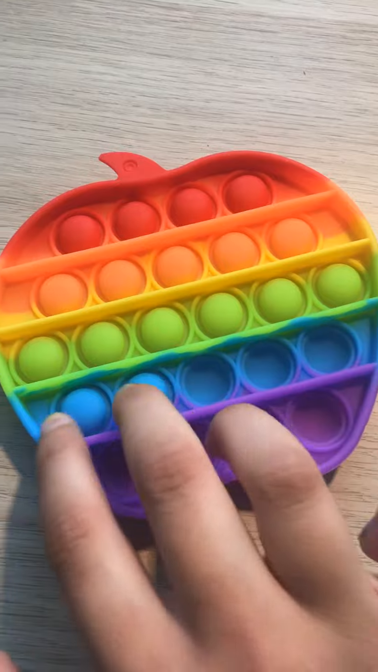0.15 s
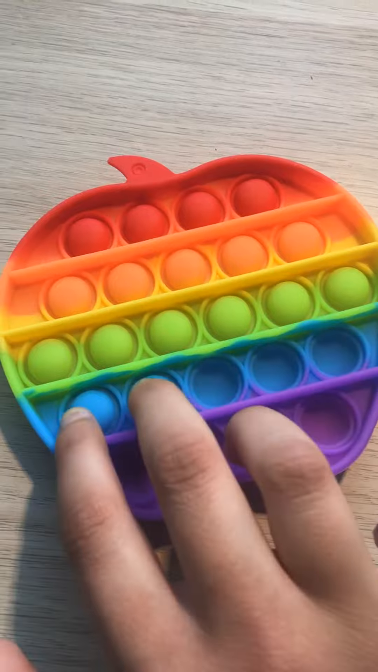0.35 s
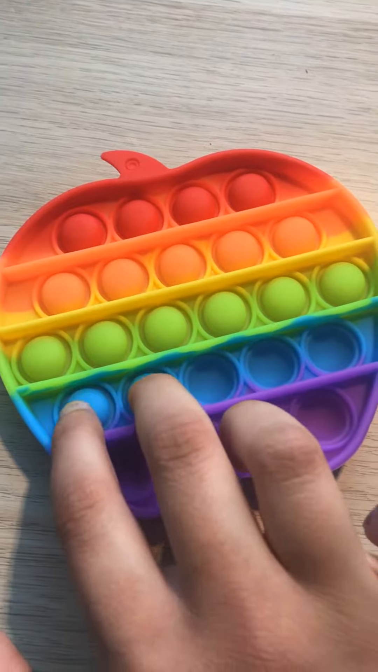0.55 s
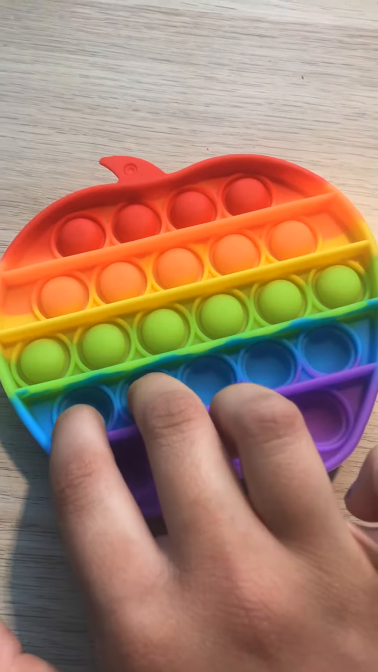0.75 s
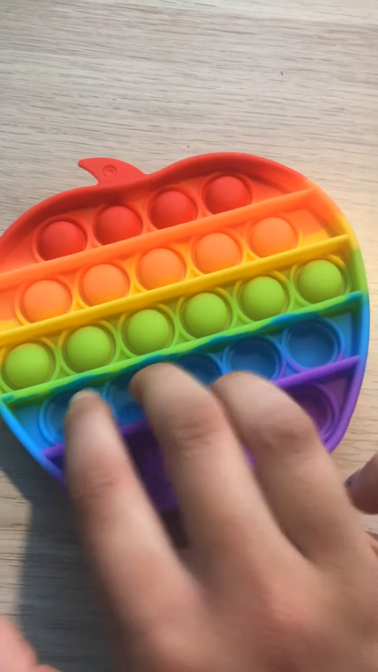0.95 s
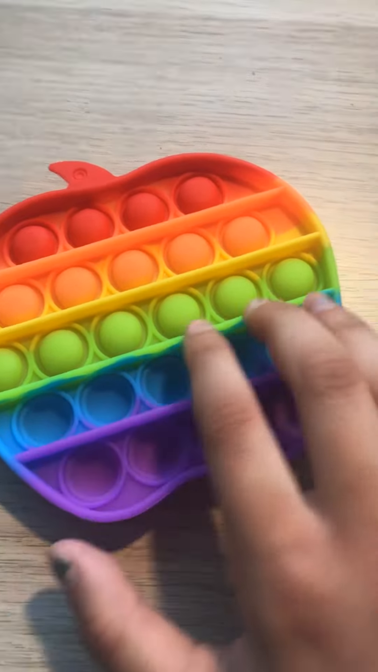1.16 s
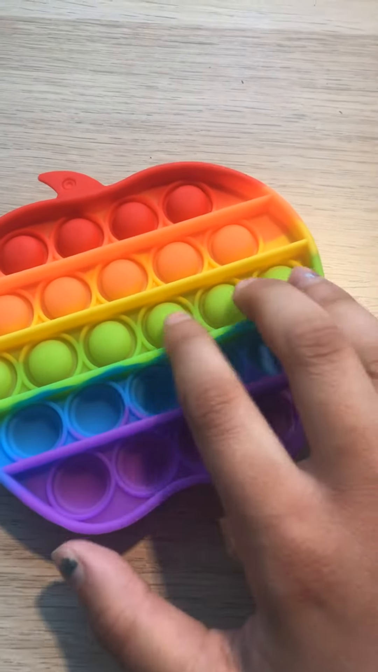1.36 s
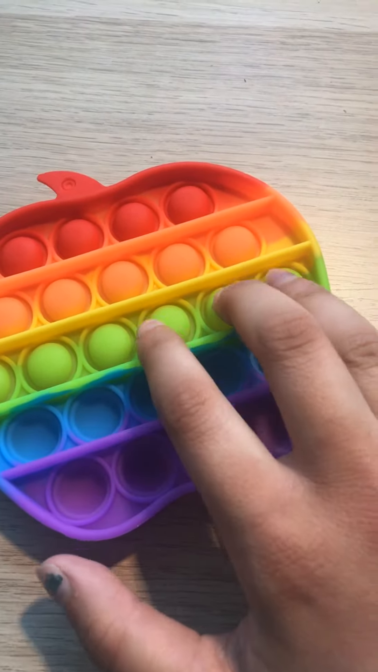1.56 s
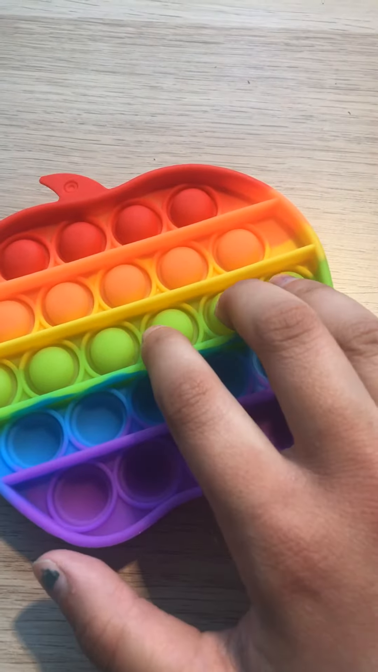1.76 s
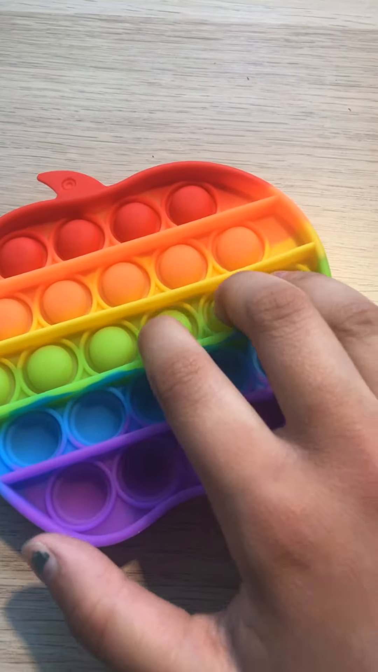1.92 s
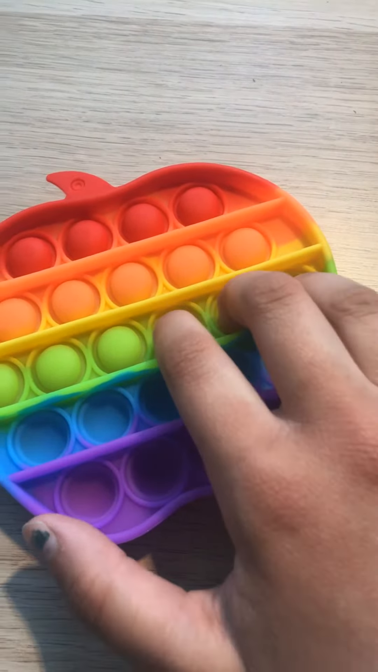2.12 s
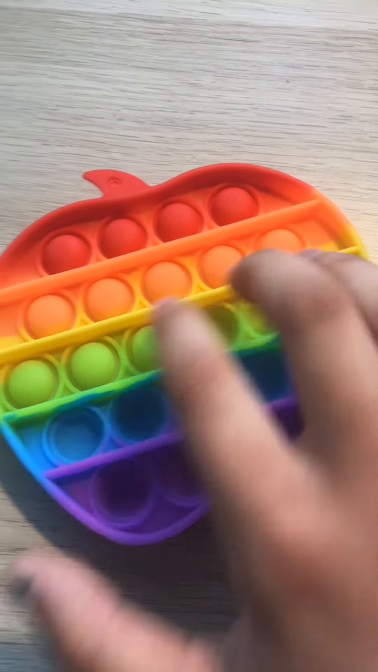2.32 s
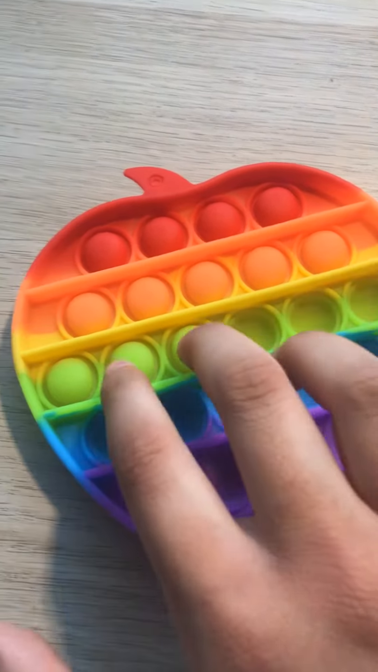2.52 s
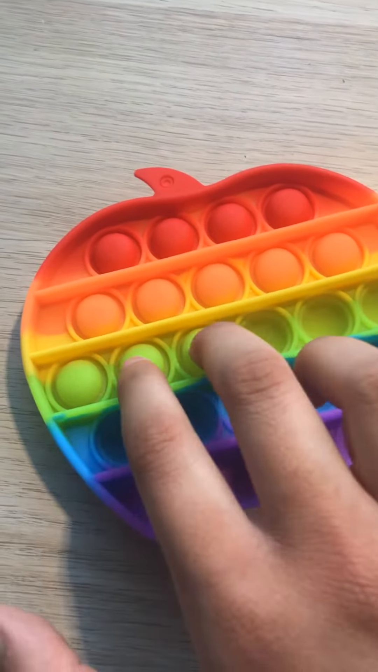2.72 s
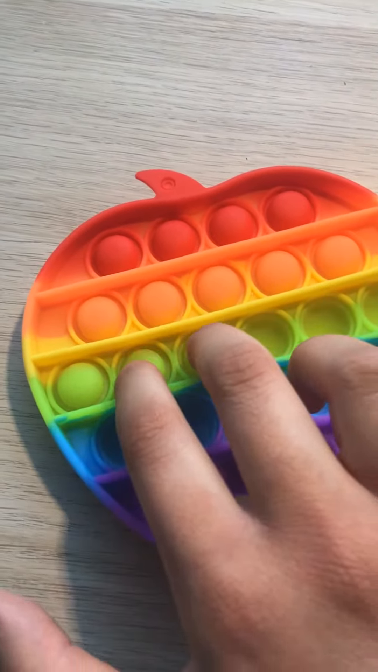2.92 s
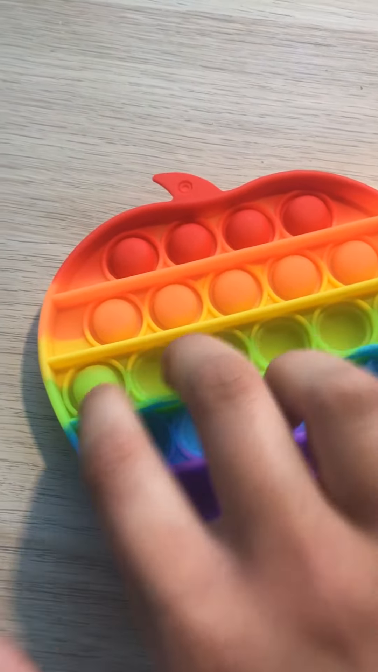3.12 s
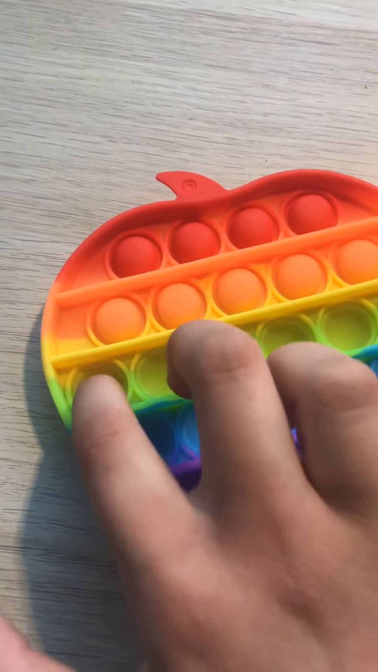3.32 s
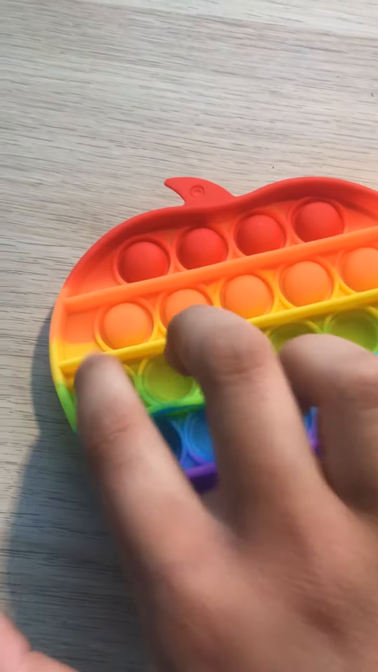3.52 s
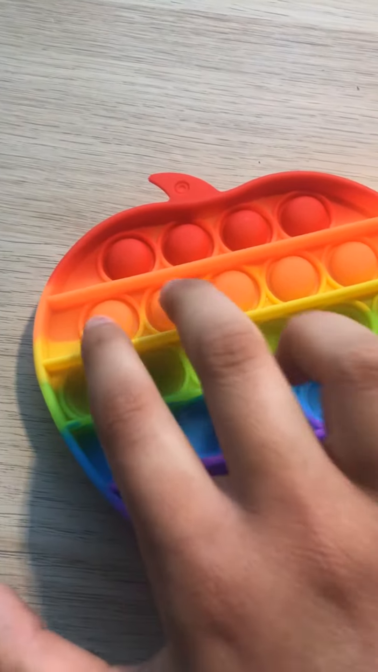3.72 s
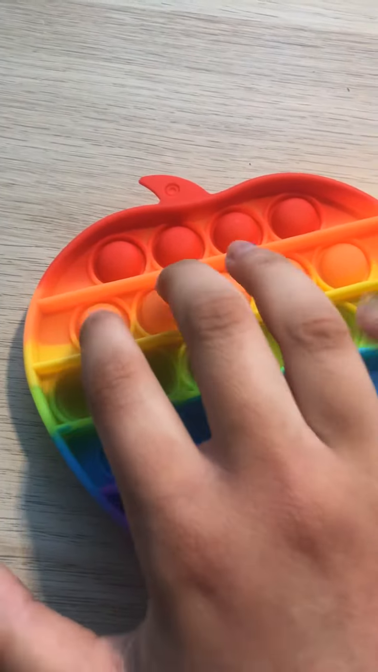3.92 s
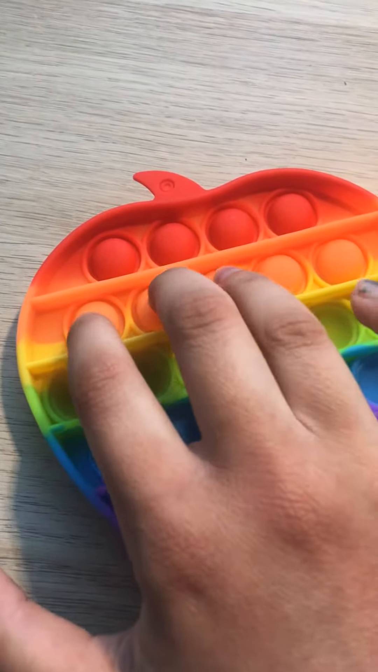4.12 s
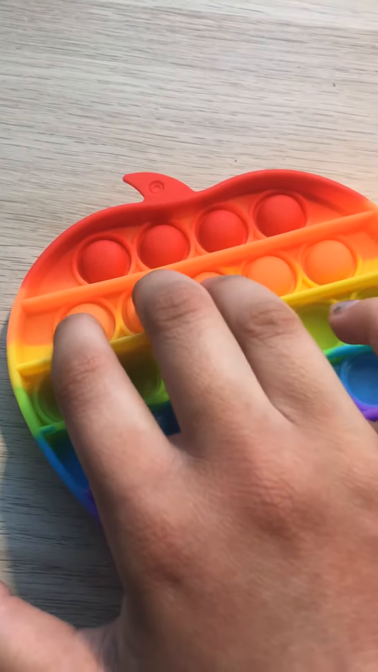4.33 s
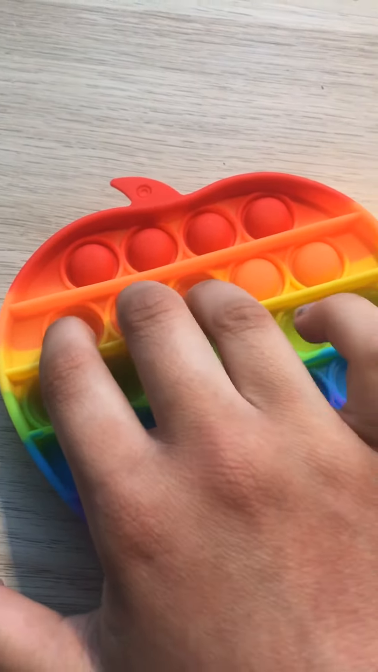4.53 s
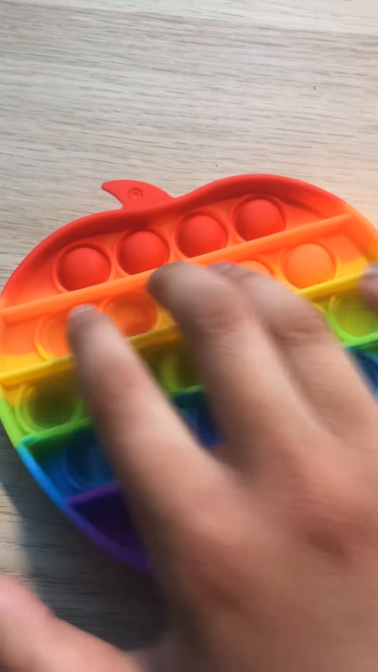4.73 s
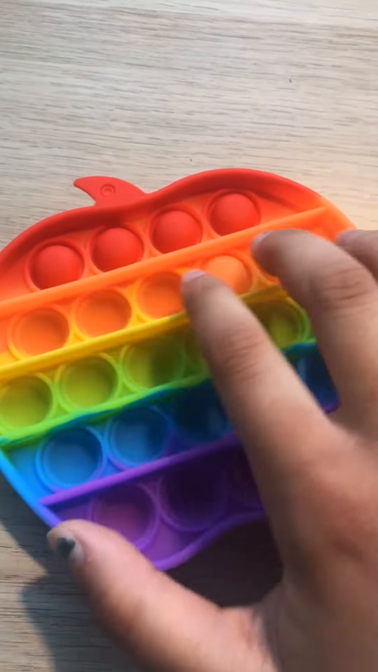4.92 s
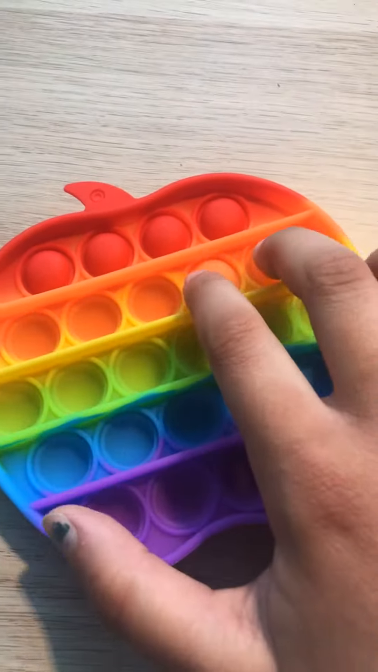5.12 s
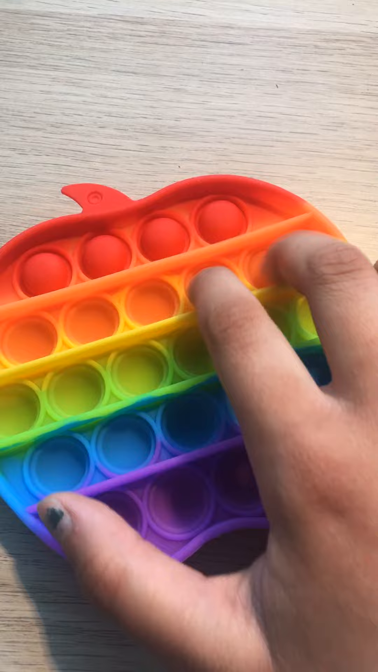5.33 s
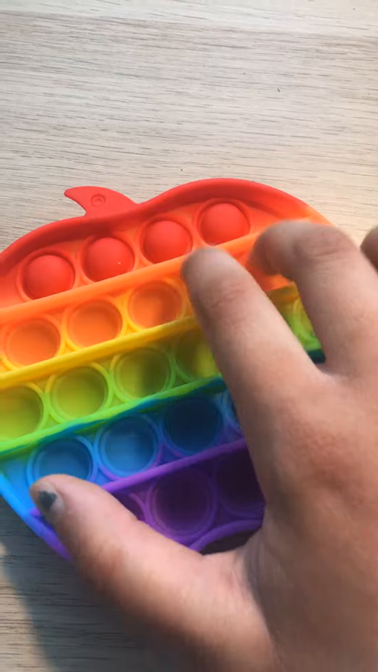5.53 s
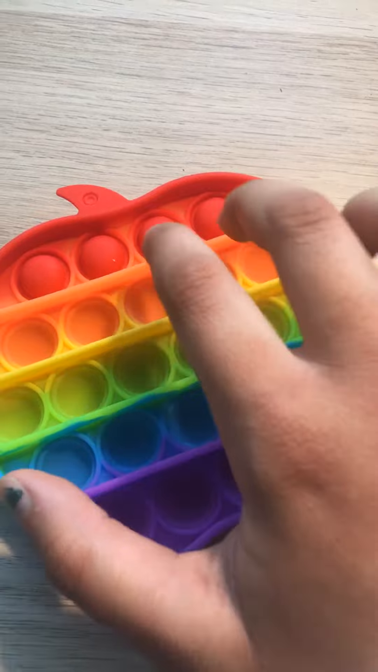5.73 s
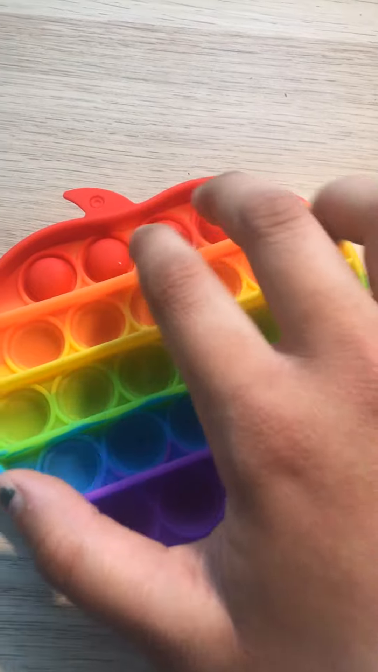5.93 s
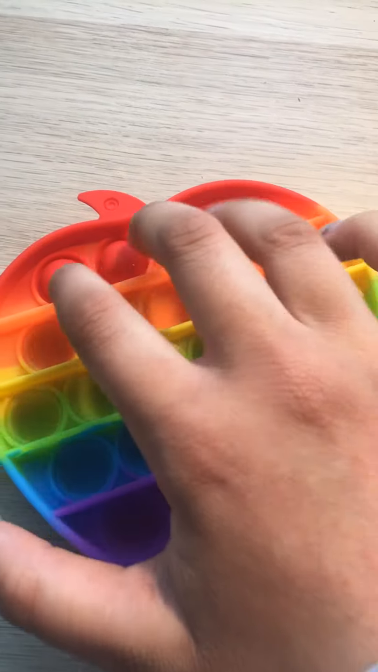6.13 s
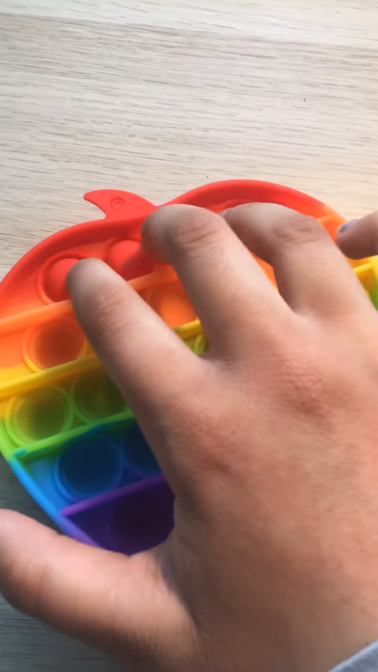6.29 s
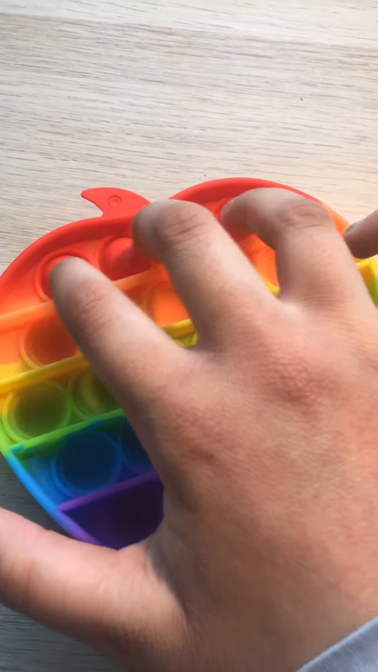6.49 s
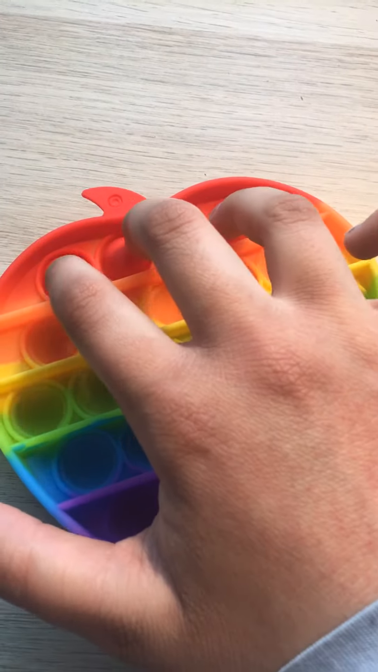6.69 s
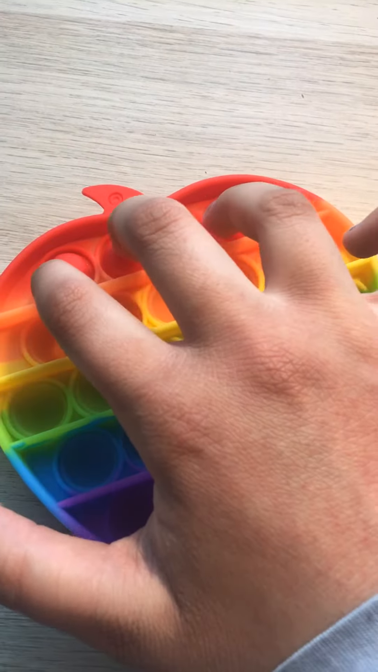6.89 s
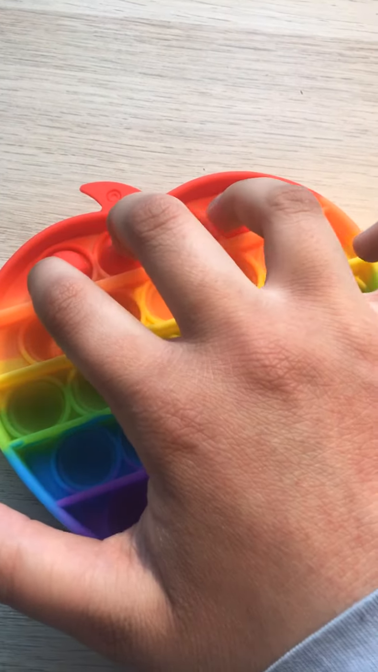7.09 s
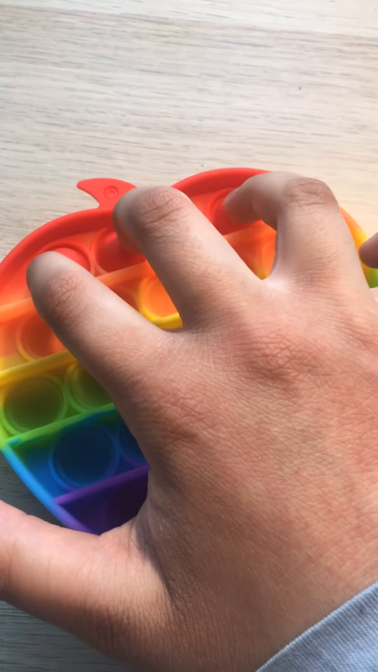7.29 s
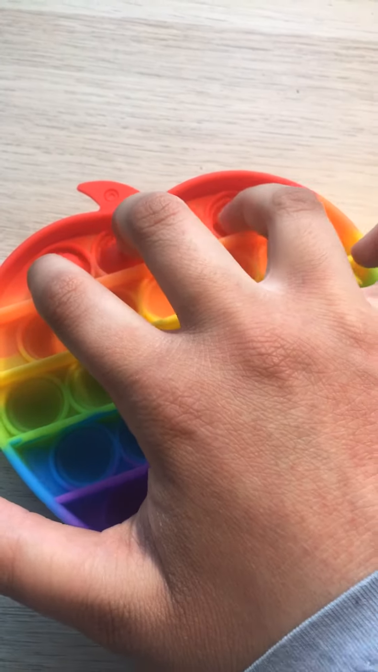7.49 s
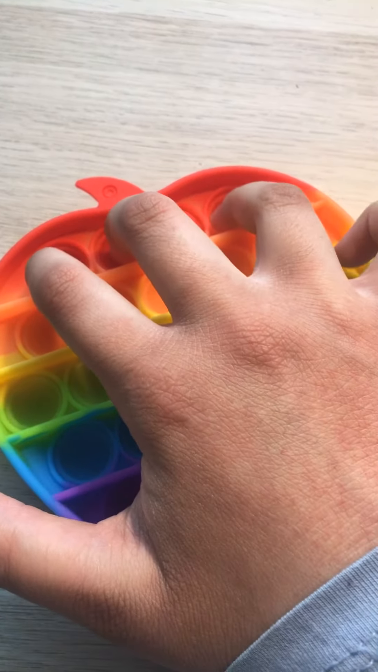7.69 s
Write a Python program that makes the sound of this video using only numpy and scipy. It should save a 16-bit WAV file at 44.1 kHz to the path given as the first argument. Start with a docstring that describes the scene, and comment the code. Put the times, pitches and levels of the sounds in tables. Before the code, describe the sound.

A rubbery bubble toy is popped by fingers on a wooden table, close to the microphone in a small quiet room. Tight pairs and triples of short hollow pops come about a second apart, with a couple of single ones, and near silence with faint soft hiss between. Later pops sound thinner, with less bass, and the last come after a long pause.

```python
"""Soft hiss runs throughout, dipping briefly near 2.15 s and 3.19 s: shaped noise.
Fingers push in the bubbles of a silicone pop-it toy on a wooden table, one to three at a time:
two at 0.7 s, three at 2.0 s, two at 3.0 s, one at 3.4 s, three at 4.5 s, two at 5.4 s, one at 7.4 s, two at 7.6 s.
In each pop faint noise swells, the skin snaps as a noisy click, and air pocket, wall, dome and rim ring as damped sines.
Table and nearby things reflect it and a small quiet room lets it die away: decaying noise as echo pattern."""
import sys
import numpy as np
from scipy import signal
from scipy.fft import rfft, irfft
from scipy.io import wavfile

SR = 44100
rng = np.random.default_rng(int(sys.argv[2]) if len(sys.argv) > 2 else 0)


def to_wav(s):
    """Save 16-bit WAV."""
    ch = np.atleast_2d(s).T  # columns
    pcm = np.round(np.clip(ch, -1, 1) * 32767)  # PCM
    wavfile.write(sys.argv[1], SR, pcm.astype(np.int16))


N = 341775


def undb(db):
    """Decibels to amplitude gain."""
    return 10 ** (np.asarray(db) / 20)


def fade(t, t60_s):
    """Exponential decay that loses 60 dB in t60_s."""
    return np.exp(-np.log(1000) * t / t60_s)


def log_bins(size):
    """Log frequency of each transform bin, offset by 1 Hz to keep DC finite."""
    return np.log(np.fft.rfftfreq(size, 1 / SR) + 1)


def gains(points, size):
    """Spectrum points interpolated over log frequency to gains on the transform bins."""
    hz, db = np.transpose(points)
    return undb(np.interp(log_bins(size), np.log(hz), db))


def add(track, start_s, sound):
    """Mix a sound into the track from start_s, cut at the track end."""
    i = int(start_s * SR)
    track[i:i + len(sound)] += sound[:len(track) - i]


# background spectrum, shape only: (frequency [Hz], relative density [dB per Hz])
HISS_SPECTRUM = [(22, -17.5), (45, -7.5), (75, 0), (105, -1.5), (400, -5), (1000, -8.5), (2600, -14.5),
                 (4400, -18), (4900, -22.5), (5900, -20), (7600, -27), (9400, -30.5), (10500, -34),
                 (14000, -34.5)]
# centres of the background dips: (time [s])
DIP_TIMES_S = [2.15, 3.19]
HISS_RMS_DB = -68
DIP_DB, DIP_WIDTH_S = -3.5, 0.11


def hiss():
    """Steady Gaussian noise with a shaped spectrum; its level dips briefly twice."""
    noise = irfft(rfft(rng.standard_normal(N)) * gains(HISS_SPECTRUM, N), N)
    t = np.arange(N) / SR
    dips = sum(np.exp(-((t - s) / DIP_WIDTH_S) ** 2) for s in DIP_TIMES_S)
    return noise / np.std(noise) * undb(HISS_RMS_DB + DIP_DB * dips)


# room bands: (centre [Hz], relative level of reflections and tail [dB], tail t60 [s])
ROOM_BANDS = [(99, 16, 0.32), (366, 6, 0.27), (600, 0, 0.12), (810, 0.5, 0.28), (900, -0.5, 0.34),
              (994, -3, 0.23), (1370, -2, 0.19), (1870, 1.5, 0.28), (2650, -4.5, 0.17), (3640, -1.5, 0.24),
              (5460, 3.5, 0.17), (6250, 2, 0.27), (11600, 11, 0.16)]
EARLY_DB, EARLY_T60_S, TAIL_DB, FIRST_ECHO_S = -34.0, 0.068, -38.0, 0.0025


def room():
    """Impulse response: dense reflections from table and nearby things, plus a tail decaying by band."""
    t = np.arange(SR // 2) / SR
    bins = log_bins(len(t))
    centres = np.log([row[0] for row in ROOM_BANDS])
    late, early = rfft(rng.standard_normal((2, len(t))))
    response = np.zeros(len(t))
    # each unit row makes one triangular band; neighbours crossfade
    for (_, db, t60_s), share in zip(ROOM_BANDS, np.eye(len(ROOM_BANDS))):
        band = undb(db) * np.interp(bins, centres, share)
        response += undb(TAIL_DB) * irfft(band * late, len(t)) * fade(t, t60_s)
        response += undb(EARLY_DB) * irfft(band * early, len(t)) * fade(t, EARLY_T60_S)
    return np.concatenate([np.zeros(int(FIRST_ECHO_S * SR)), response])


def click(points, size=1024):
    """Minimum-phase click: the most compact causal pulse with the given spectrum."""
    cepstrum = irfft(np.log(gains(points, size)))
    # fold the cepstrum onto positive time
    cepstrum[1:size // 2] *= 2
    cepstrum[size // 2 + 1:] = 0
    return irfft(np.exp(rfft(cepstrum)))


# spectrum of the buckling skin's snap: (frequency [Hz], relative level [dB])
SNAP_SPECTRUM = [(70, 10), (250, -12.5), (500, -23.5), (1000, -14.5), (2000, 8), (2800, -2), (3150, -1),
                 (3600, -3), (5000, -5.5), (6000, -6), (7500, -20.5), (10000, -32.5), (14000, -59.5)]
SNAP_DB = -21.5
LEAD_IN_DB, LEAD_IN_T60_S = -19, 0.012  # re jolt
RUB_DB, RUB_T60_S = -8.5, 0.0075  # re jolt


def snap(t):
    """A faint noise swells just before the jolt of the skin, then silicone rubs on the fingertip."""
    size = len(t)
    lead_in = undb(LEAD_IN_DB) * rng.standard_normal(size) * fade(t, LEAD_IN_T60_S)
    jolt = undb(RUB_DB) * rng.standard_normal(size) * fade(t, RUB_T60_S)
    jolt[0] += 1
    # reversed decay: a swell
    excitation = np.concatenate([lead_in[::-1], jolt])
    return undb(SNAP_DB) * signal.fftconvolve(excitation, click(SNAP_SPECTRUM))[:2 * size]


def mode(t, hz, t60_s, rise_s):
    """Damped vibration that builds up while the dome flips over."""
    return -np.sin(2 * np.pi * hz * t) * fade(t, t60_s) * (1 - np.exp(-t / rise_s))


def pocket_swell(t, pocket):
    """Faint pocket-pitched noise swelling up to the snap: reversed decay through the pocket's ring."""
    swell = undb(-48.0) * rng.standard_normal(len(t)) * fade(t, t60_s=0.046)
    return np.append(signal.fftconvolve(swell[::-1], pocket), 0)


# silicone is well damped: wall, dome and rim ring only briefly
POCKET_T60_S, DOME_T60_S, RIM_T60_S = 0.0088, 0.0092, 0.0055
WALL_HZ, WALL_T60_S = 739, 0.014
# levels re push at the usual pitches
USUAL_POCKET_HZ, USUAL_WALL_DB, WALL_DB_PER_OCTAVE = 1195, -14.5, 33
USUAL_DOME_HZ, USUAL_DOME_DB, DOME_DB_PER_OCTAVE = 1615, -15, -9.5


def pop(pocket_db, pocket_hz, dome_hz, rim_db, rim_hz, size=2048):
    """One bubble: faint noise swells, the dome snaps through at the middle, four damped modes ring."""
    t = np.arange(size) / SR
    # a tighter, higher pocket shakes the wall more; a stiffer, higher dome swings less
    wall_db = USUAL_WALL_DB + WALL_DB_PER_OCTAVE * np.log2(pocket_hz / USUAL_POCKET_HZ)
    dome_db = USUAL_DOME_DB + DOME_DB_PER_OCTAVE * np.log2(dome_hz / USUAL_DOME_HZ)
    pocket = undb(pocket_db) * mode(t, pocket_hz, POCKET_T60_S, rise_s=0.0013)
    wall = undb(wall_db) * mode(t, WALL_HZ, WALL_T60_S, rise_s=0.0074)
    dome = undb(dome_db) * mode(t, dome_hz, DOME_T60_S, rise_s=0.0018)
    rim = undb(rim_db) * mode(t, rim_hz, RIM_T60_S, rise_s=0.00052)
    ring = np.concatenate([np.zeros(size), pocket + wall + dome + rim])
    skin = snap(t)
    return ring + pocket_swell(t, pocket) - skin


RUMBLE_CUT_HZ = 76  # a bubble radiates next to nothing below


def radiate(x, corner_hz):
    """A source as small as a bubble sends out little bass: two first-order high-passes."""
    for hz in (corner_hz, RUMBLE_CUT_HZ):
        x = signal.sosfilt(signal.butter(1, hz, "high", fs=SR, output="sos"), x)
    return x


# bubbles; a better seal on the table makes the air pocket louder:
# (snap time [s], push level [dB], air pocket level re push [dB], air pocket [Hz], dome [Hz],
#  rim level re push [dB], rim [Hz])
BUBBLES = [ (0.6613, 0.5, -5, 1210, 1680, -21, 2470), (0.6892, -0.5, -5.5, 1193, 1810, -28, 2500),
           (2.008, -3, -17.5, 1330, 1585, -16.5, 2600), (2.035, 0.5, -12.5, 1040, 1650, -28, 2550),
           (2.0541, -1, -10, 1194, 1990, -17, 2590), (3.0112, 1, -17.5, 1040, 1253, -16, 2555),
           (3.0398, -5.5, -4.5, 1164, 1350, -19.5, 2660), (3.3780, 0, -7.5, 1017, 1650, -31.5, 2530),
           (4.4802, -1, -11, 1060, 1620, -18, 2450), (4.4906, -1.5, -5, 1037, 1320, -24, 2570),
           (4.508, -0.5, -6.5, 1265, 2010, -21.5, 2480), (5.3940, 0.5, -10, 1260, 1620, -25, 2320),
           (5.404, -1, -4, 1277, 1800, -26, 2500), (7.4166, 1, -11, 1000, 1256, -27.5, 3350),
           (7.6170, -0.5, -4, 1060, 1230, -24, 2320), (7.6502, 1.5, -4.5, 1025, 1264, -22.5, 2330), ]
# bass thins as the hand works up to the narrow top of the toy
FIRST_CORNER_HZ, LAST_CORNER_HZ = 150, 720


def pops():
    """Each dome sits at its own place under the hand, so each draws its own reflections."""
    track = np.zeros(N)
    for snap_s, push_db, pocket_db, pocket_hz, dome_hz, rim_db, rim_hz in BUBBLES:
        corner_hz = np.interp(snap_s, [0, N / SR], [FIRST_CORNER_HZ, LAST_CORNER_HZ])
        bubble = pop(pocket_db, pocket_hz, dome_hz, rim_db, rim_hz)
        direct = undb(push_db) * radiate(bubble, corner_hz)
        start_s = snap_s - len(direct) / 2 / SR
        add(track, start_s, direct)
        add(track, start_s, signal.fftconvolve(direct, room()))
    return track


def scene():
    """Close pops with their reflections over the hiss, one channel."""
    return (pops() + hiss())[None]


TOP_HZ = 14500


def record(dry):
    """The phone cuts the highest treble: steep elliptic low-pass."""
    return signal.sosfilt(signal.ellip(8, .2, 70, TOP_HZ, fs=SR, output="sos"), dry)


dry = scene()
out = record(dry)
to_wav(out)
```